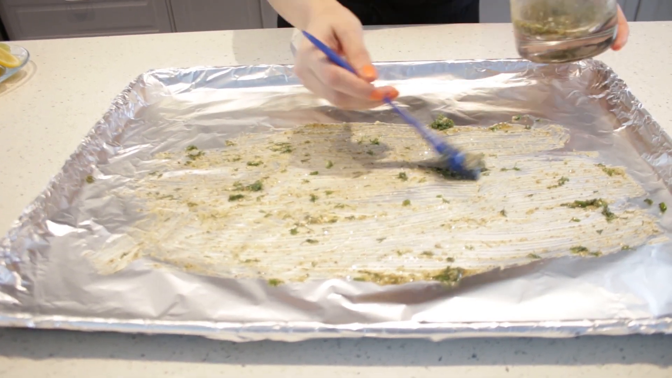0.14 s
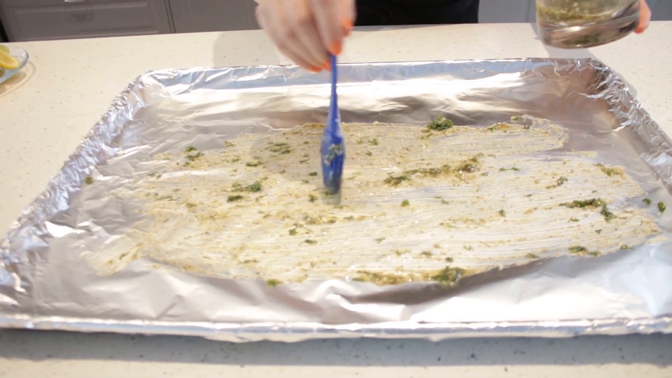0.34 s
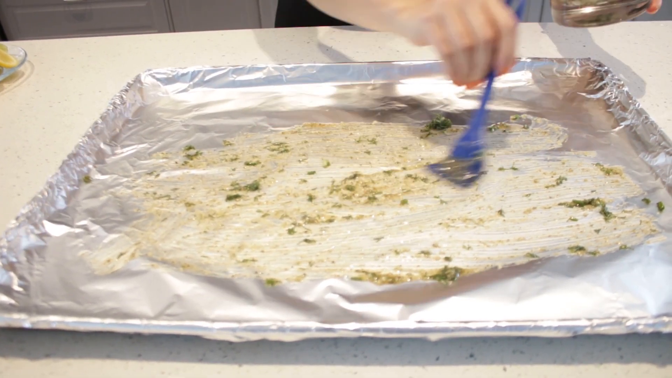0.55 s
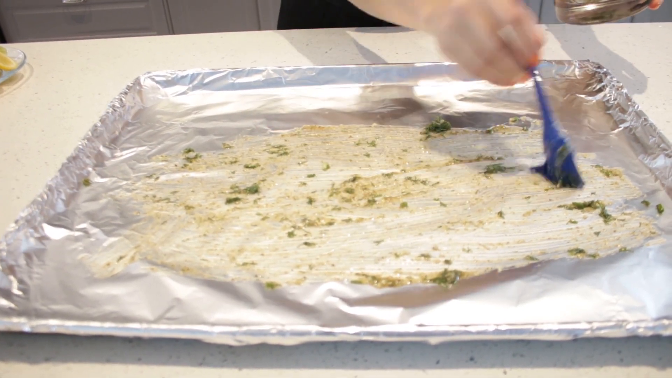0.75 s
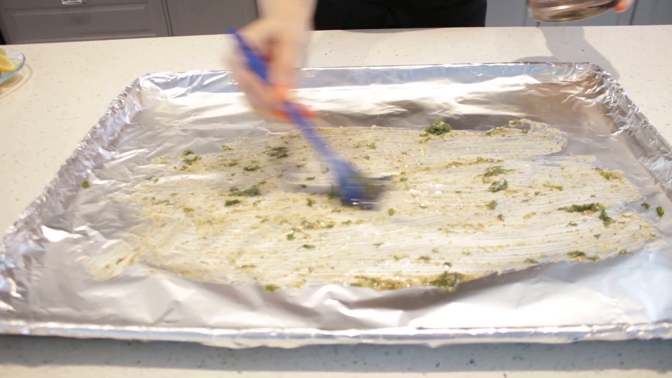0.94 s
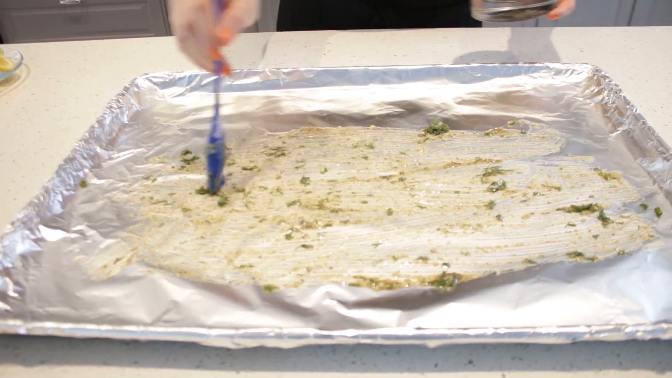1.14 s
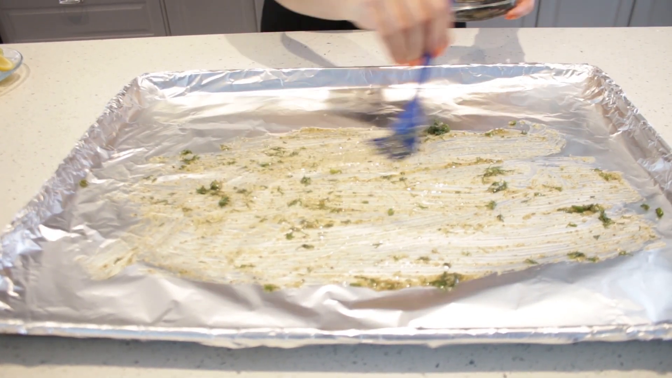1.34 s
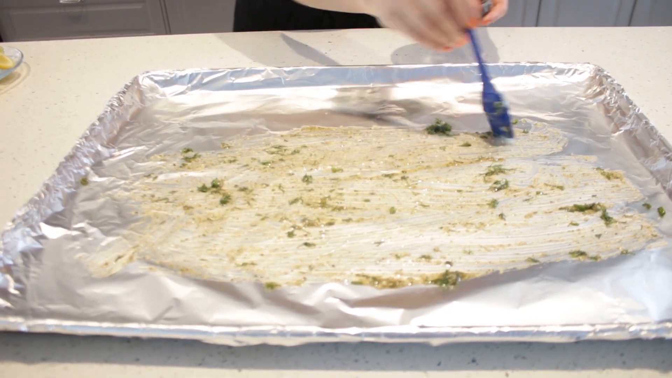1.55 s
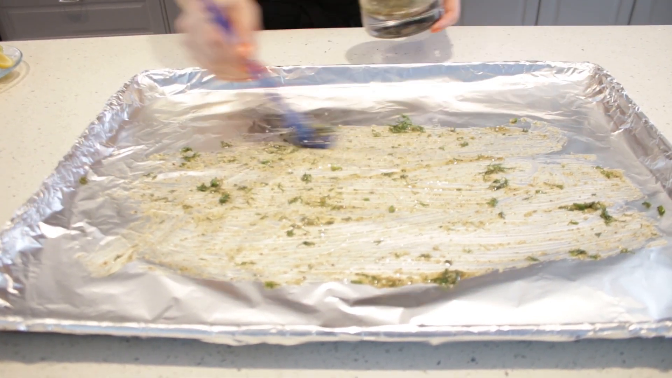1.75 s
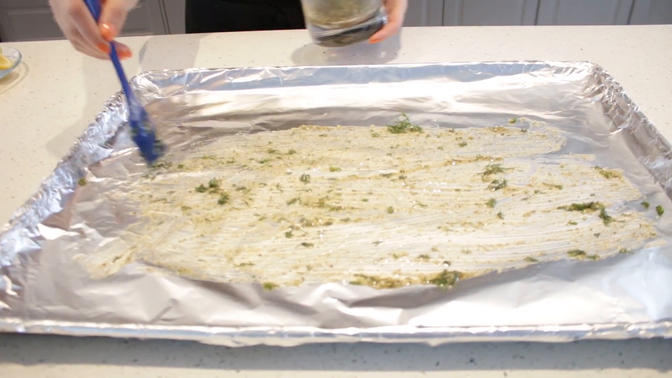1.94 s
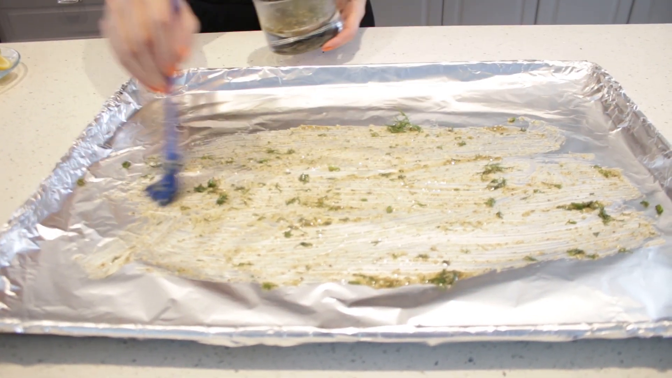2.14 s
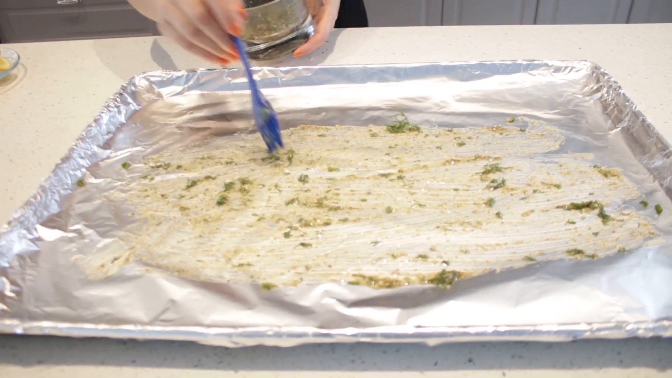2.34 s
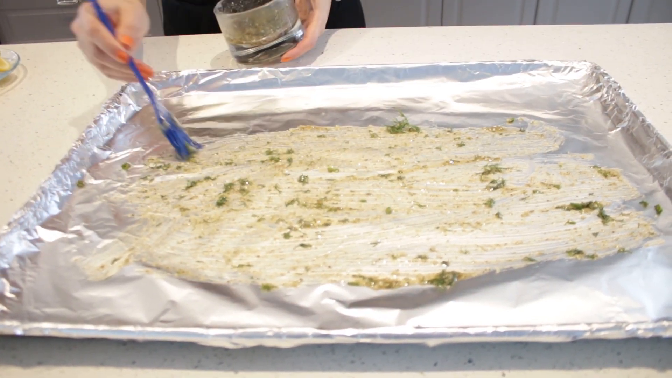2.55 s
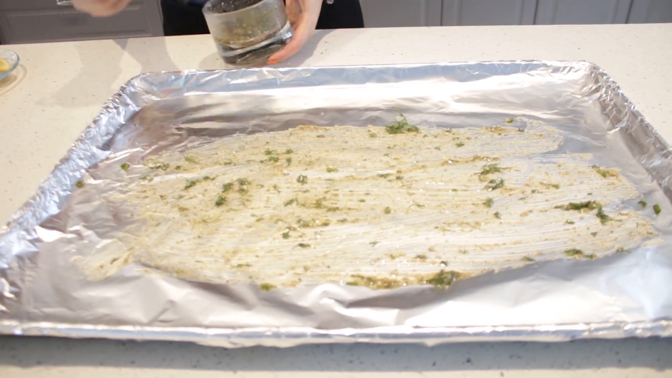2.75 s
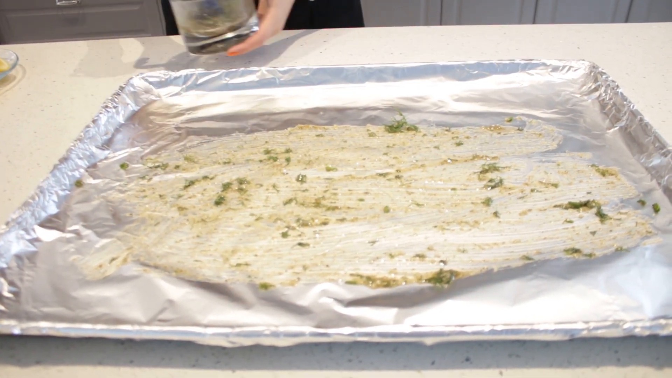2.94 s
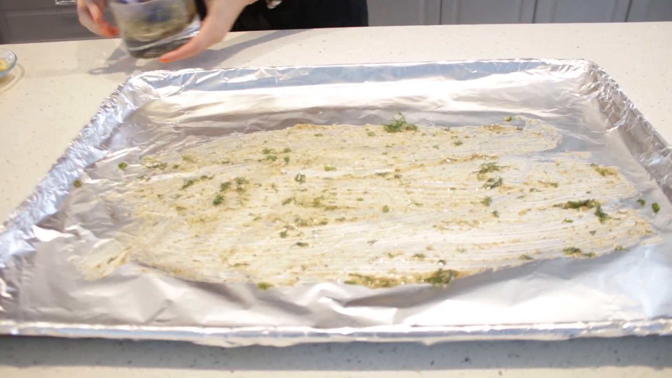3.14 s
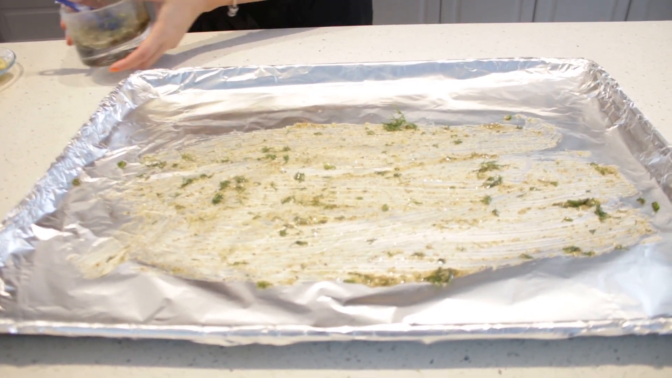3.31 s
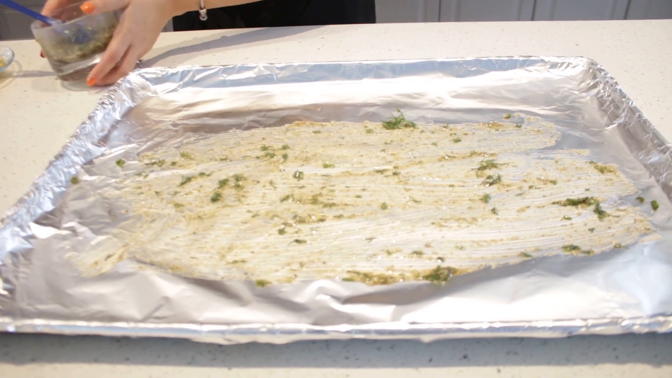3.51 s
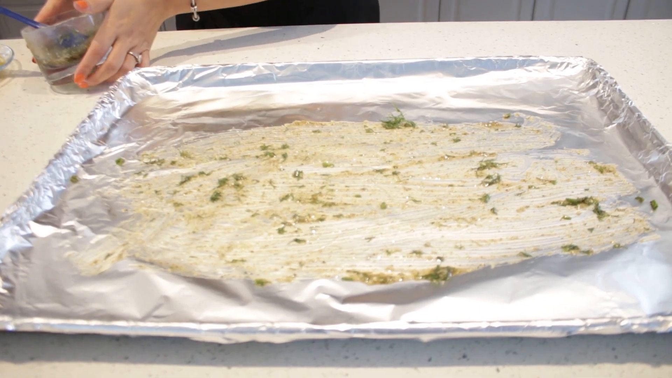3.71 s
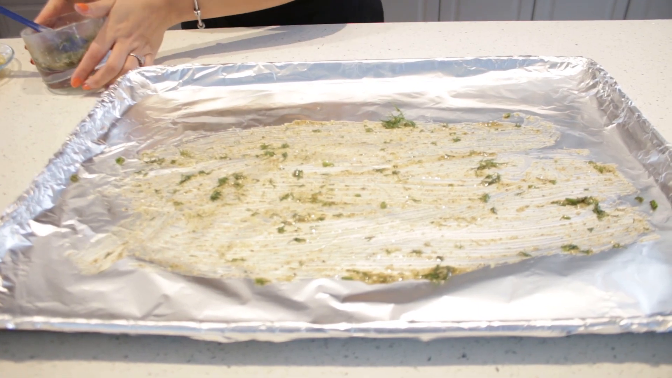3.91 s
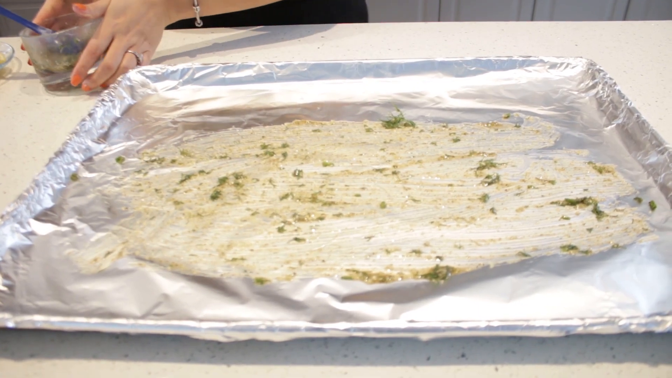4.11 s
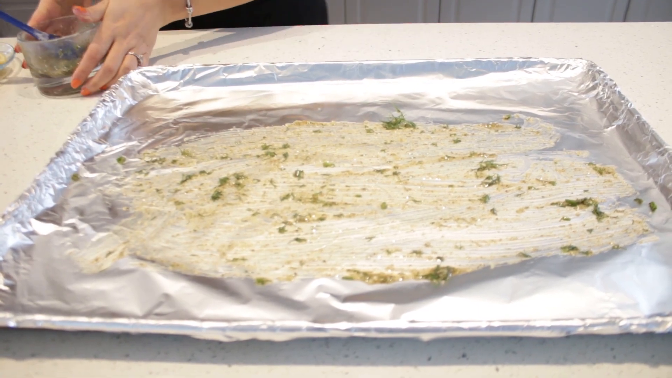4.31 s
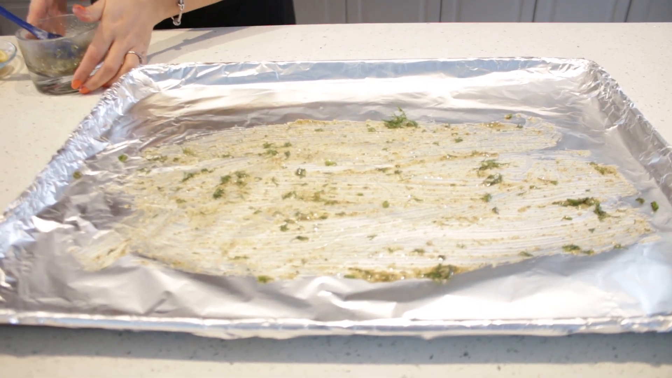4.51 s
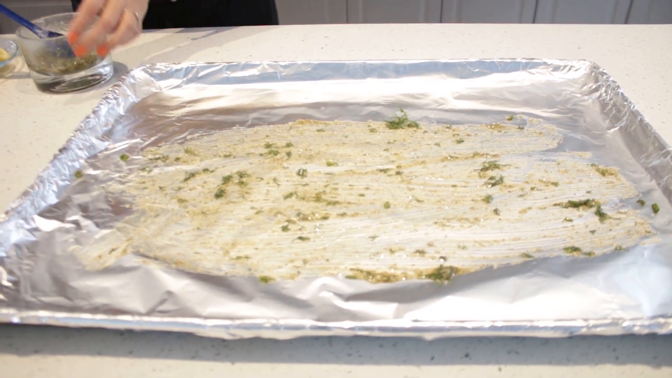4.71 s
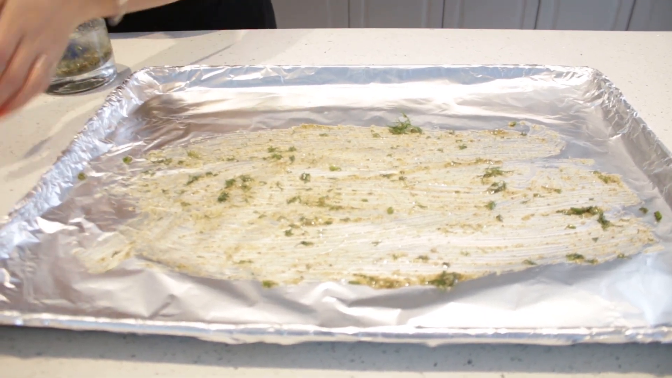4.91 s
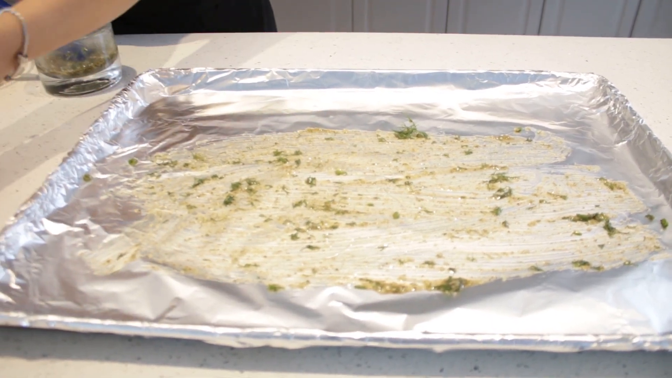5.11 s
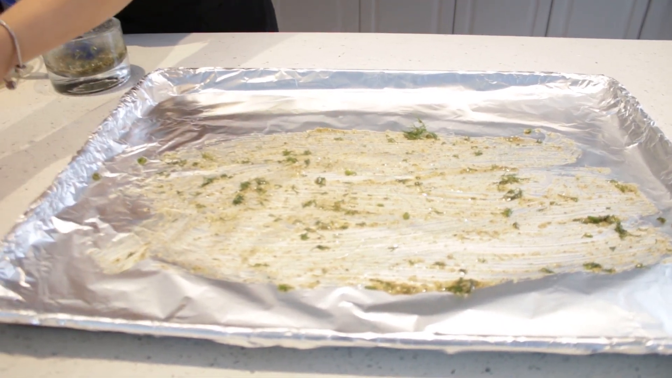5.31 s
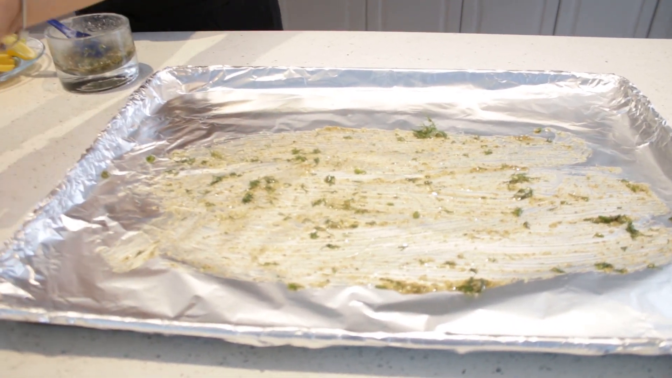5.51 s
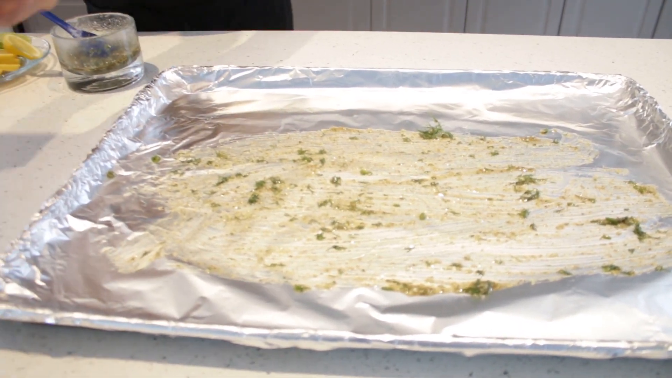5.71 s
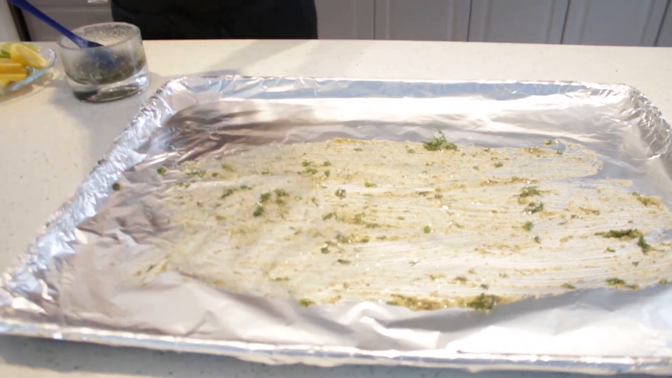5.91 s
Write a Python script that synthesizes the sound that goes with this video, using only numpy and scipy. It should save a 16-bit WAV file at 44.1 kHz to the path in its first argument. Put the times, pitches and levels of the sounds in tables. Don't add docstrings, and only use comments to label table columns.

```python
import sys
import numpy as np
from scipy import signal
from scipy.io import wavfile
from scipy.ndimage import uniform_filter1d

SR = 44100
rng = np.random.default_rng(int(sys.argv[2]) if len(sys.argv) > 2 else 0)


def digitize_waveform(pressure):
    field = np.atleast_2d(pressure).T
    bounded = np.clip(field, -1, 1)
    quanta = np.round(bounded * 32767).astype(np.int16)
    wavfile.write(sys.argv[1], SR, quanta)


def rack_gain(trim_db):
    fader = np.asarray(trim_db, float)
    return 10 ** (fader / 20)


N = 267246

# pitch_hz, level_db
AIR_COLOUR = [(12, -42), (20, -12), (81, -18.5), (270, -10), (367, -14), (513, -2.5), (642, -11), (849, 1),
              (1150, -9), (1260, -2), (1370, -15), (2600, -17), (5080, -32), (14700, -36), (16000, -40)]
# pitch_hz, width_hz, level_db
MOTOR_TONES = [(264, 20, -72), (450, 30, -63), (520, 26, -60.5), (760, 60, -62), (870, 60, -58),
               (1050, 40, -64), (1229, 8, -59)]
# pitch_hz, time_to_fall_60_db_s
ROOM_DECAY = [(100, .4), (300, .55), (900, .5), (2500, .56), (5000, .46), (9000, .3), (15000, .15)]
# delay_s, level_db
EARLY_ECHOES = [(.0045, -9), (.0093, -7), (.0135, -11), (.0245, -9)]

# pitch_hz, level_db
FOIL_COLOUR = [(150, -80), (700, -34), (1300, -13), (1650, -7), (2350, .3), (3300, -3), (4000, 0),
               (4700, -1.5), (6800, -6.5), (8300, -12.5), (9800, -26), (13000, -60)]
BRISTLE_COLOUR = [(2000, -80), (6500, -26), (8400, -5), (10600, 0), (12300, -1.5), (15000, -7),
                  (16200, -18)]
RUSTLE_COLOUR = [(150, -70), (400, -24), (1170, -8), (1520, -5), (2300, -1.5), (3300, -9), (5130, -19),
                 (7210, -28), (10000, -42)]
# pitch_hz, width_hz, level_db
BOARD_MODES = [(770, 55, 0), (900, 110, -5), (1150, 150, -10), (500, 150, -14)]
# most_pressure_s, press_s, lift_s, crackle_db, fizz_over_crackle_db
BRUSH_STROKES = [(.315, .13, .05, -44, -10), (.575, .06, .08, -45, -12), (.67, .2, .22, -50, -5),
                 (.95, .11, .12, -44, -12), (1.11, .12, .11, -42, -15), (1.31, .1, .08, -37, -16),
                 (1.43, .11, .17, -35.5, -17), (1.71, .08, .1, -36, -14), (1.82, .13, .12, -29, -10),
                 (1.915, .08, .1, -30, -8), (2.2, .03, .1, -45, -14), (2.28, .08, .14, -41, -13),
                 (2.545, .04, .09, -38, -13)]
# most_pressure_s, press_s, lift_s, rustle_db, fizz_over_rustle_db
HAND_MOVES = [
    (3.7, .25, .2, -60, -22),
    (4.17, .035, .12, -44, -34),
    (4.455, .08, .07, -50, -17),
    (5.19, .08, .12, -42, -22),
    (5.29, .14, .12, -36, -26),
    (5.47, .08, .14, -48, -18),
    (5.83, .13, .1, -53, -9),
    (5.98, .04, .2, -54, -22),
]
# most_pressure_s, press_s, lift_s, scuff_db, fizz_over_scuff_db
COUNTER_SCUFFS = [
    (1.27, .04, .1, -41, -40),
    (3.56, .07, .07, -49, -40),
    (4.17, .04, .12, -38, -44),
    (4.35, .06, .06, -39.5, -44),
]

# start_s, level_db, time_to_fall_60_db_s, fizz_over_crackle_db
LONG_CREASES = [(.2384, -48, .043, -13), (.302, -38, .057, -13), (.3107, -35, .044, -19),
                (.5546, -33, .063, -18), (.569, -34, .066, -18), (.8076, -48, .038, -17),
                (.8879, -35, .053, -14), (.9872, -31, .059, -16), (.996, -35, .041, -21),
                (1.0859, -34, .065, -18), (1.1214, -28, .035, -11), (1.2421, -39, .111, -15),
                (1.3069, -29, .072, -12), (1.3808, -36, .038, -23), (1.4057, -34, .046, -9),
                (1.43, -35, .049, -15), (1.49, -32, .085, -9), (1.6571, -34, .118, -1),
                (1.697, -31, .057, -10), (1.7315, -25, .09, -4), (1.7873, -22, .1, -7),
                (1.815, -31, .112, -6), (1.8482, -23, .09, -8), (1.9006, -23, .103, -4),
                (1.965, -34, .09, -3), (2.1859, -37, .068, -20), (2.5172, -38, .091, -10),
                (2.5311, -30, .09, -14), (2.6284, -48, .1, -12), (5.175, -38, .087, -20)]
# start_s, level_db, pitch_hz, fizz_over_crackle_db
CREASE_SNAPS = [(.2668, -41, 3528, -15), (.2892, -40, 3969, -18), (.6724, -40, 4410, -17),
                (.6893, -39, 2646, -8), (.7165, -40, 5500, -14), (.7452, -33, 2866, -6),
                (.8579, -50, 6000, 1), (.9178, -38, 4189, -20), (.949, -35, 2205, -22),
                (.9697, -30, 4630, -17), (1.28, -33, 3748, -13), (1.3428, -34, 3748, -28),
                (1.5554, -41, 2646, -7), (1.945, -30, 2425, -4), (2.2563, -39, 4851, -15),
                (2.274, -36, 4500, -18), (2.2872, -28, 3528, -16), (2.297, -33, 4800, -12),
                (2.305, -33, 4500, -18), (2.387, -39, 3307, -25), (2.4164, -42, 3528, -24),
                (2.424, -42, 4000, -18), (4.004, -47, 4100, -26), (4.027, -56, 6500, -18),
                (5.54, -53, 2646, -8), (5.766, -54, 6000, 2), (5.819, -51, 6000, 1.5),
                (5.847, -43, 1984, -9), (5.857, -48, 4500, -6), (5.864, -44, 5500, -14)]
# start_s, level_db, pitch_hz, fizz_over_crackle_db
BRISTLE_PRICKS = [(0.5114, -45, 3200, -10), (0.8824, -28, 4070, -20), (0.9393, -26, 4180, -19),
                  (1.043, -35, 3870, -22), (1.0594, -37, 3350, -14), (1.0954, -30, 3640, -11),
                  (1.1344, -34, 3250, -22), (1.1554, -34, 4680, -27), (1.1674, -37, 3260, -26),
                  (1.1804, -40, 4280, -24), (1.2654, -26, 3960, -19), (1.2865, -23, 3680, -27),
                  (1.2964, -29, 5000, -16), (1.3069, -21, 3820, -19), (1.3204, -24, 4030, -29),
                  (1.4104, -25, 6010, -18), (1.4204, -26, 4540, -16), (1.4551, -26, 5030, -21),
                  (1.4624, -28, 4140, -21), (1.4834, -23, 5530, -17), (1.6262, -42, 4090, 7),
                  (1.8274, -13, 3960, -19), (1.8514, -17, 5880, -14), (1.9114, -16, 3910, -13),
                  (2.2084, -32, 3990, -15), (3.9639, -44, 3360, -20), (3.9944, -35, 3360, -34),
                  (4.0794, -47, 3420, -20), (4.1754, -44, 3560, -23), (4.4268, -47, 3300, -18),
                  (5.1831, -26, 3730, -30)]
# start_s, peak_db, pitch_hz
TRAY_BOOMS = [(0.29, -37, 781), (0.342, -41, 861), (0.536, -35, 834), (0.561, -33, 770), (0.89, -36, 743),
              (0.996, -33, 767), (1.051, -36, 786), (1.258, -34, 821), (1.302, -32, 799), (1.409, -34, 754),
              (1.45, -36, 770), (1.492, -33, 851), (1.665, -37, 775), (1.727, -30, 770), (1.748, -29, 799),
              (1.807, -29, 799), (1.861, -35, 775), (2.151, -41, 810), (2.184, -41, 904), (2.226, -38, 821),
              (2.248, -39, 826), (2.272, -37, 748), (2.329, -37, 764), (2.536, -38, 735)]
# start_s, peak_db, pitch_hz, knock_db, knock_hz
SMALL_TAPS = [(1.2484, -29, 2200, -39, 842), (1.258, -36, 1400, -38, 1100), (1.276, -37, 1350, -38, 1050),
              (1.5344, -33, 2540, -41, 799), (3.5464, -46, 1820, -42, 859), (3.5724, -46, 1820, -44, 805),
              (3.675, -38, 2030, -42, 595), (3.6894, -44, 2020, -42, 546), (4.1424, -40, 2260, -42, 1060),
              (4.155, -38, 2300, -46, 900), (4.179, -38, 2250, -42, 1150), (4.345, -50, 1300, -45, 930),
              (5.1145, -29, 2700, -50, 600), (5.1188, -22, 2560, -40, 310), (5.1347, -14, 2700, -50, 877),
              (5.1378, -21, 2600, -42, 700), (5.1836, -25, 2320, -44, 921), (5.2064, -26, 2610, -46, 980),
              (5.2265, -24, 2320, -39, 1200), (5.2405, -24, 2000, -40, 1300), (5.2435, -16, 2240, -36, 904),
              (5.2674, -24, 2380, -34, 799), (5.273, -25, 2450, -48, 900), (5.2812, -9.5, 2320, -34, 1170),
              (5.2934, -21, 2220, -36, 740), (5.31, -25, 2200, -36, 950), (5.3154, -22, 2100, -38, 1100),
              (5.328, -32, 2200, -36, 930), (5.4321, -21, 2670, -29, 921), (5.439, -36, 2600, -35, 900),
              (5.456, -14, 2650, -36, 584), (5.4624, -30, 2770, -39, 802), (5.8476, -33, 2020, -47, 705),
              (5.9618, -28, 2150, -42, 912)]
# start_s, level_db, rise_s
RING_GRAZES = [
    (3.834, -48, .003),
    (4.1, -58, .01),
    (4.128, -59, .008),
    (4.25, -65, .006),
    (4.425, -63, .01),
]
# pitch_hz, level_db, time_to_fall_60_db_s
RIM_MODES = [(4380, 0, .1), (5240, -10, .05), (5945, -2, .22), (6616, -8, .12), (7850, -8, .1),
             (8899, -13, .1), (9550, -15, .08), (10650, -15, .08), (11700, -18, .08)]

# start_s, ring_db, crack_db, rise_s
GLASS_LANDS = (3.8232, -9, 3.5, .0008)
# start_s, ring_db, crack_db, rise_s
BRUSH_TOUCHES = (4.5218, -8.5, -22, .003)
# start_s, ring_db, crack_db, rise_s
BRUSH_DROPS = (4.5452, -9, 1.7, .0008)
# pitch_hz, level_db, time_to_fall_60_db_s
COUNTER_MODES = [(95, -38, .08), (180, -24, .07), (460, -22, .08), (610, -9, .05), (759, -7, .05),
                 (885, -3, .05), (970, -3, .04), (1056, -8, .04), (1255, -8, .05), (1466, -2, .045),
                 (1900, -8, .03), (2350, -9, .035), (2622, -17, .04), (1660, -10, .04), (3830, -22, .06),
                 (4581, -30, .12)]
TOUCH_MODES = [(955, 0, .024), (1300, -12, .015), (1950, -11, .02), (3900, -26, .04)]
GLASS_MODES = [(200, -24, .08), (458, -15, .07), (560, -15, .05), (846, -6, .06), (885, -6, .06),
               (950, -4, .06), (1055, -6, .05), (1400, -3, .03), (1690, -7, .05), (2050, -11, .04),
               (2406, -14, .05), (2622, -8, .06), (2914, -4, .05), (3300, -9, .03), (3811, -13, .25),
               (3903, -13, .5), (3900, 9, .034), (3978, -16, .25)]
# pitch_hz, level_db
THUD_COLOUR = [(24, -80), (90, -42), (245, -24), (520, -16), (700, -12), (890, -2), (1110, -5), (1300, -2),
               (1450, .5), (1600, -3), (1910, -9), (2300, -11), (2900, -17), (3400, -28), (3900, -27),
               (4800, -43), (12000, -70), (22000, -120)]
CLACK_COLOUR = [(24, -85), (100, -37), (377, -16), (514, -19), (849, -5), (1130, -5), (1900, -10),
                (2940, -8), (3450, -17), (3910, -2), (4250, -19), (4700, -26), (12000, -54), (22000, -120)]


def evened(x):
    return x / np.sqrt(np.mean(x ** 2) + 1e-20)


def read(points, hz):
    f, value = np.transpose(points)
    return np.interp(np.log(hz + 1), np.log(f + 1), value)


def add(mix, start_s, sound):
    part = mix[round(start_s * SR):][:len(sound)]
    part += sound[:len(part)]


def colour(x, spectrum):
    gain_db = read(spectrum, abs(np.fft.fftfreq(8192, 1 / SR)))
    log_gain = np.log(rack_gain(np.maximum(gain_db, -90)))
    phase = -signal.hilbert(log_gain).imag
    response = np.fft.ifft(np.exp(log_gain + 1j * phase)).real[:4096]
    return signal.oaconvolve(x, response)[:len(x)]


def resonate(x, hz, width):
    pole = np.exp((2j * hz - width) * np.pi / SR)
    return 2 * signal.lfilter([1 - abs(pole)], [1, -pole], x).real


def drift(length, seconds):
    size = max(int(seconds * SR), 1)
    once = uniform_filter1d(rng.standard_normal(length), size)
    return evened(uniform_filter1d(once, size))


def slips(length, per_s, spread_db, smooth):
    size = rack_gain(spread_db * np.minimum(rng.exponential(1, length), 5)) * rng.standard_normal(length)
    clicks = evened(size * (rng.random(length) < per_s / SR))
    return clicks + smooth * rng.standard_normal(length)


def appliance():
    noise = rng.standard_normal((2, N))
    air = evened(colour(noise[0], AIR_COLOUR)) * rack_gain(-48.2)
    tones = np.zeros(N)
    for hz, width, db in MOTOR_TONES:
        tones += rack_gain(db) * evened(resonate(resonate(noise[1], hz, width), hz, width))
    return air + tones * rack_gain(1.5 * drift(N, .1))


def kitchen(x, tail_db):
    reflections = np.zeros(SR)
    at = np.arange(200, SR - 20, 20)
    reflections[at + rng.integers(0, 20, len(at))] = rng.choice([-1., 1.], len(at))
    hz, t, bands = signal.stft(reflections, SR, nperseg=256)
    decay = rack_gain(-60 * t / read(ROOM_DECAY, hz)[:, None])
    tail = signal.istft(bands * decay, SR, nperseg=256)[1]
    tail = rack_gain(tail_db) * tail / np.linalg.norm(tail)
    for delay_s, db in EARLY_ECHOES:
        add(tail, delay_s, rack_gain(np.array([db])))
    return signal.fftconvolve(x, tail)[:N]


def grazes():
    out, t = np.zeros(N), np.arange(12000) / SR
    chance = rng.standard_normal((len(RING_GRAZES), len(RIM_MODES)))
    for (start_s, level_db, rise_s), luck in zip(RING_GRAZES, chance):
        ring = np.zeros(len(t))
        for (hz, db, t60), c in zip(RIM_MODES, luck):
            ring += rack_gain(db + 3 * c - 60 * t / t60) * np.sin(2 * np.pi * hz * (1 + .006 * c) * t)
        flicker = rack_gain(level_db + 4 * drift(len(t), .006))
        add(out, start_s, flicker * ring * np.minimum(t / rise_s, 1))
    return out


def taps():
    out, t = np.zeros(N), np.arange(3000) / SR
    for start_s, db, hz, knock_db, knock_hz in SMALL_TAPS:
        grit = colour(rng.standard_normal(len(t)) * np.exp(-t / .0012), RUSTLE_COLOUR)
        ring = np.sin(2 * np.pi * hz * t) * rack_gain(-60 * t / .012)
        ring += .8 * grit / abs(grit).max()
        thump = .2 * np.sin(2 * np.pi * .3 * knock_hz * t)
        knock = np.sin(2 * np.pi * knock_hz * t) + thump
        knock = knock * rack_gain(knock_db + 10.5 - 60 * t / .018)
        add(out, start_s, (rack_gain(db + .4) * ring + knock) * np.minimum(t / .0009, 1))
    return signal.sosfilt(signal.butter(3, 190, "highpass", fs=SR, output="sos"), out)


def booms():
    out, t = np.zeros(N), np.arange(4000) / SR
    swell_s = .0055
    swell = (t / swell_s) * np.exp(1 - t / swell_s)
    for start_s, db, hz in TRAY_BOOMS:
        add(out, start_s, rack_gain(db - 4) * swell * np.sin(2 * np.pi * hz * t))
    return out


def creases():
    out, t = np.zeros(N), np.arange(6000) / SR
    spray = slips(N, 6000, spread_db=2.2, smooth=.8)
    crackle, fizz = evened(colour(spray, FOIL_COLOUR)), evened(colour(spray, BRISTLE_COLOUR))
    snap_t60, tick_s = .014, .0004
    pitch = 3500 * (1 + .3 * rng.uniform(-1, 1, len(LONG_CREASES)))
    rows = [(s, db, hz, t60, fizz_db) for (s, db, t60, fizz_db), hz in zip(LONG_CREASES, pitch)]
    rows += [(s, db, hz, snap_t60, fizz_db) for s, db, hz, fizz_db in CREASE_SNAPS]
    rows += [(s, db - 10, hz, .7 * snap_t60, fizz_db) for s, db, hz, fizz_db in BRISTLE_PRICKS]
    tick = (t / tick_s) * np.exp(1 - t / tick_s)
    for start_s, db, hz, t60, fizz_db in rows:
        now = slice(int(start_s * SR) - len(t), int(start_s * SR))
        tips = rack_gain(fizz_db + 2.5 - 30 * t / t60) * fizz[now]
        tuned = .5 + .6 * (t60 < .02)
        sound = (1.3 - .6 * tuned) * crackle[now] + tips
        sound += tuned * evened(resonate(crackle[now], hz, .3 * hz))
        shape = rack_gain(-60 * (t / t60) ** 1.3) * np.minimum(t / (.0004 + .035 * t60), 1)
        add(out, start_s, rack_gain(db - 2.2) * .85 * (shape + tick) * sound)
    return out


def levels(moves, thrum_follow):
    t = np.arange(N) / SR
    surface, tips = np.zeros((2, N))
    for peak_s, press_s, lift_s, db, fizz_db in moves:
        distance = abs(t - peak_s) / np.where(t < peak_s, press_s, lift_s)
        ease_db = 20 * distance ** 1.5
        surface += rack_gain(db - ease_db)
        tips += rack_gain(db + fizz_db - 1.2 * ease_db)
    return surface, tips, surface ** thrum_follow


def rub(moves, surface, per_s, flicker_db, crackle_db, fizz_db, thrum_db, thrum_follow):
    drive = slips(N, per_s, spread_db=2.5, smooth=.9) * rack_gain(flicker_db * drift(N, .006))
    bumps = rng.standard_normal(N) * rack_gain(3 * drift(N, .012))
    thrum = np.zeros(N)
    for hz, width, db in BOARD_MODES:
        thrum += rack_gain(db) * resonate(resonate(bumps, hz, width), hz, 3 * width)
    crackle_gain, fizz_gain, thrum_gain = levels(moves, thrum_follow)
    crackle = rack_gain(crackle_db) * crackle_gain * evened(colour(drive, surface))
    fizz = rack_gain(fizz_db) * fizz_gain * evened(colour(drive, BRISTLE_COLOUR))
    return crackle + fizz + rack_gain(thrum_db) * thrum_gain * evened(thrum)


def blow(row, modes, spectrum):
    start_s, ring_db, crack_db, rise_s = row
    t = np.arange(SR) / SR
    ring, linger = np.zeros((2, SR))
    for k, (hz, db, t60) in enumerate(modes):
        wave = rack_gain(ring_db + db) * np.sin(2 * np.pi * (hz * t + .5 * (k % 2)))
        ring += wave * rack_gain(-60 * t / t60)
        linger += wave * np.sqrt(min(t60, .06) / .05) * (t60 > .031)
    linger = linger * rack_gain(-15 - 60 * t / .4) * np.minimum(t / .015, 1)
    contact = .13 * rng.standard_normal(SR) * np.exp(-t / .013)
    contact[int(rise_s * SR)] += 1.5
    crack = colour(contact, spectrum)
    crack = rack_gain(crack_db + 14.5) * crack / np.linalg.norm(crack)
    onset = np.minimum(t / rise_s, 1)
    direct, sent = np.zeros((2, N))
    add(direct, start_s, (ring + linger + crack) * onset)
    add(sent, start_s, (rack_gain(-6) * ring + crack) * onset)
    return np.array([direct, sent])


def scene():
    small = taps()
    light = creases() + booms() + grazes()
    light += rub(BRUSH_STROKES, FOIL_COLOUR, per_s=3000, flicker_db=2.5, crackle_db=-2.5, fizz_db=.1,
                 thrum_db=-29, thrum_follow=.55)
    light += rub(HAND_MOVES, RUSTLE_COLOUR, per_s=2500, flicker_db=2.5, crackle_db=-1.5, fizz_db=-.5,
                 thrum_db=-15.5, thrum_follow=.85)
    light += rub(COUNTER_SCUFFS, RUSTLE_COLOUR, per_s=2500, flicker_db=2.5, crackle_db=-11, fizz_db=-9,
                 thrum_db=-2, thrum_follow=1)
    glass, glass_sent = blow(GLASS_LANDS, COUNTER_MODES, THUD_COLOUR)
    touch = blow(BRUSH_TOUCHES, TOUCH_MODES, THUD_COLOUR)
    brush, brush_sent = touch + blow(BRUSH_DROPS, GLASS_MODES, CLACK_COLOUR)
    room = kitchen(rack_gain(-12.5) * light + rack_gain(-15) * small + rack_gain(-8) * glass_sent, tail_db=1.5)
    room += kitchen(rack_gain(-4) * brush_sent, tail_db=1.5)
    no_rumble = signal.butter(2, 70, "highpass", fs=SR, output="sos")
    close = signal.sosfilt(no_rumble, light + small + glass + brush + room)
    return (close + appliance())[None]


def low_pass(x):
    return signal.sosfilt(signal.butter(12, 16650, fs=SR, output="sos"), x)


def record(dry):
    mix = np.clip(dry, -.94, .94)
    return low_pass(mix)


dry = scene()
out = record(dry)
digitize_waveform(out)
```